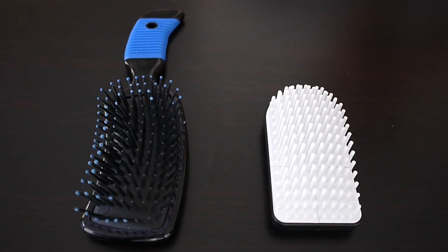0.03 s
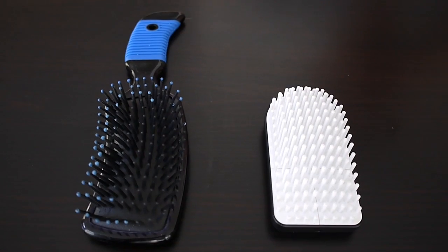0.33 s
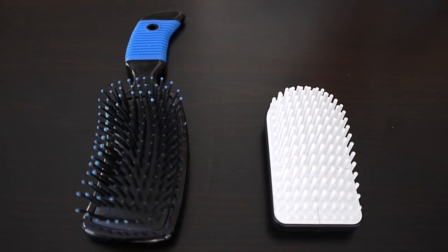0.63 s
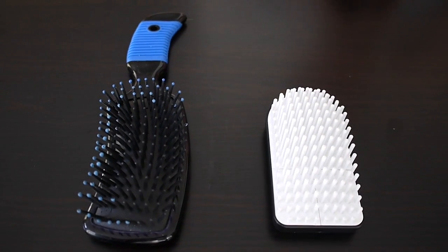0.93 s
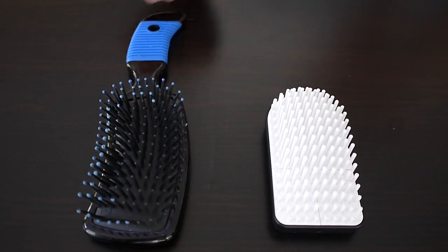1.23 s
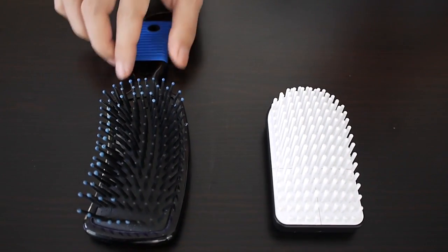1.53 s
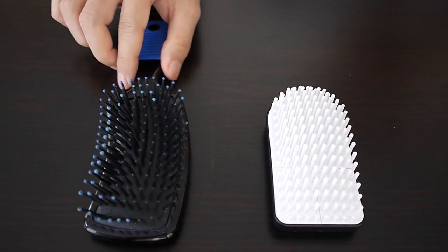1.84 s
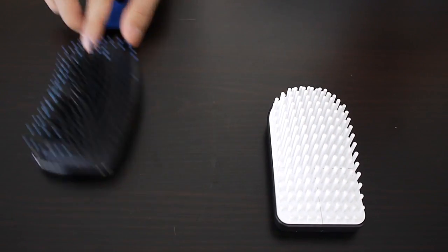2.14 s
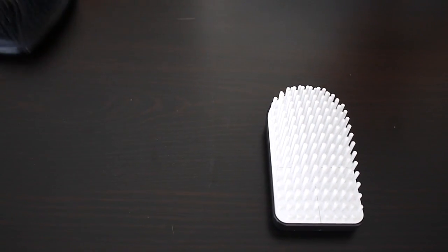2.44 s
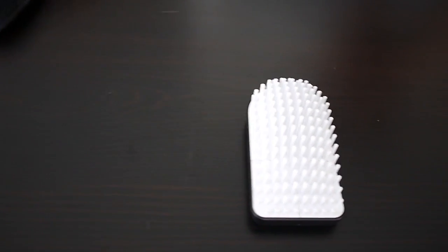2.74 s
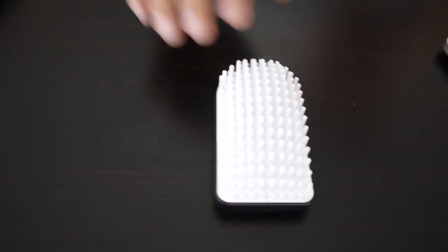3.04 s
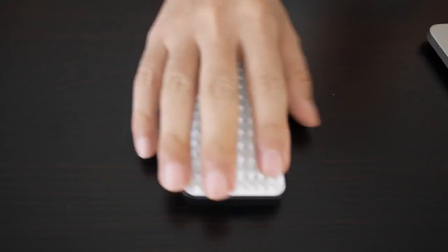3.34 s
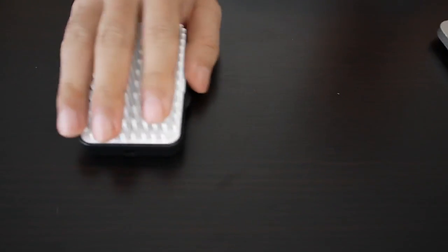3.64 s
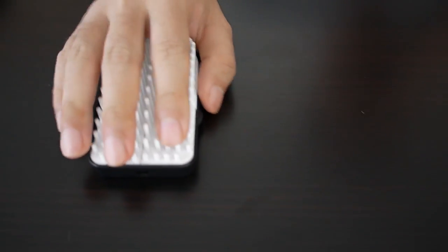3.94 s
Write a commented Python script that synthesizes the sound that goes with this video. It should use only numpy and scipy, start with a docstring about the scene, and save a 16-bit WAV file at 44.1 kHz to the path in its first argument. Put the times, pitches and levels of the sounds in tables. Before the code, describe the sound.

A plastic hairbrush scrapes across a wooden table after a few light taps, then rattles down. A second brush slides with a darker scrape and ends in a click, heard close up in a small, quiet room.

```python
"""In a small room with steady background noise, a sleeve rustles among light taps and faint soft blips.
From 1.9 s a plastic hairbrush is pulled across a wooden table; by 2.8 s it has knocked down at the edge.
At 3.4 s a hand lands on a flat-backed brush and slides it away, and it clicks down near 3.9 s.
Countless tiny contacts ring each plastic back, brighter as it moves faster,
and shake the table top, which booms at every knock."""
import sys
import numpy as np
from scipy import signal
from scipy.fft import rfft, irfft
from scipy.io import wavfile

SR = 44100
rng = np.random.default_rng(int(sys.argv[2]) if len(sys.argv) > 2 else 0)


def wrap_up_sound(samples):
    """Save the sound to the file named by the first command line argument, as 16-bit audio."""
    columns = np.atleast_2d(samples).T
    # keep every value between -1 and 1, then stretch to whole-number steps
    tamed = np.clip(columns, -1, 1)
    steps = np.round(tamed * 32767).astype(np.int16)
    wavfile.write(sys.argv[1], SR, steps)


N = 176400
T = np.arange(N) / SR
FREQS = np.arange(N // 2 + 1) * SR / N
TOP_HZ = 15400

# speed surges of the pull: top speed t/s, rise/s, fall/s, scrape/dB, treble/dB, rumble/dB
HAIRBRUSH_PULLS = [(1.93,0.057,0.12,-48,-57.5,-47),(2.03,0.068,0.34,-39.5,-49.5,-44.5),(2.212,0.17,0.035,-34.5,-29.5,-55),(2.255,0.071,0.071,-57,-29.5,-48),(2.344,0.053,0.045,-40,-29,-59),(2.405,0.082,0.15,-34.5,-28.5,-42),(2.513,0.027,0.044,-32,-56,-62)]
# scrape EQ: f/Hz, level/dB
HAIRBRUSH_EQ = [(200,-20),(450,-29),(750,-7),(1000,-0.5),(2200,-4),(7800,-10.5),(10500,-14.5),(15500,-27)]
# resonances of the plastic back: f/Hz, width/Hz, boost/dB
HAIRBRUSH_BODY = [(1412,68,7.5),(1910,120,3.5),(2680,410,4),(3480,160,4),(7700,120,4)]
def hairbrush_pull():
    """The hairbrush's back scrapes over the wood in bright surges."""
    return slide(HAIRBRUSH_PULLS, HAIRBRUSH_EQ, HAIRBRUSH_BODY, start_s=1.87, rumble_cut_hz=380)


# gliding rasp: t/s, f/Hz, level/dB
RASP = [(1.9,1051,-49),(2.12,1309,-40.5),(2.22,1411,-36.5),(2.29,1248,-59),(2.39,1055,-34),(2.52,1320,-54),(2.62,1050,-57)]
# hollow drone: t/s, f/Hz, level/dB
DRONE = [(1.92,321.7,-53.5),(2.04,327.3,-39),(2.12,369.6,-54),(2.255,368.7,-41),(2.295,278.6,-48),(2.495,286.5,-42),(2.56,290,-62)]
def hairbrush_notes():
    """Friction draws a rasp and a drone from the moving hairbrush."""
    return resonance(RASP, width_hz=350) + resonance(DRONE, width_hz=103)


# knocks and rattle: t/s, thud/dB, boom/dB, clack/dB, brightness/Hz, hollow ring/dB
HAIRBRUSH_KNOCKS = [(2.375,-21.5,-37.5,-26,1405,-44),(2.49,-36,-38.5,-45,2000,-56),
                    (2.7106,-25,-61,-20,5160,-28.5),(2.7468,-31.5,-44,-19,3600,-36.5),(2.755,-37,-40,-22.5,1600,-39),(2.792,-37,-44.5,-28,2090,-54)]
# modes of the plastic and of the hollow: f/Hz, level/dB, t60/s
HAIRBRUSH_RING = [(1320,-1,0.017),(2734,5,0.0054),(3750,5,0.0033)]
HOLLOW_RING = [(340,0,0.077)]
# crack EQ: f/Hz, level/dB
HAIRBRUSH_CRACK = [(600,-17),(1300,6),(4600,-3.5),(8500,-32)]
def hairbrush_knocks():
    """The hairbrush rattles down, ringing the hollow under its bristle cushion."""
    hits = knocks(HAIRBRUSH_KNOCKS, HAIRBRUSH_RING, HAIRBRUSH_CRACK, crack_db=-7)
    hollow = convolve(blows(HAIRBRUSH_KNOCKS, column=5), ring(HOLLOW_RING))
    return hits + in_room(hollow)


# speed surges of the push: top speed t/s, rise/s, fall/s, scrape/dB, treble/dB, rumble/dB
FLAT_PUSHES = [(3.50,0.083,0.051,-32.5,-42,-45),(3.60,0.12,0.094,-34,-40,-43.5),(3.68,0.02,0.057,-39.5,-55,-40),(3.80,0.16,0.37,-60.5,-61.5,-60)]
# scrape EQ: f/Hz, level/dB
FLAT_EQ = [(200,-18),(430,-1),(1100,-2),(1550,-5),(1950,-12),(2300,-5),(3500,-11.5),(4400,-17.5),(8500,-23),(15500,-37.5)]
# resonances of the flat back: f/Hz, width/Hz, boost/dB
FLAT_BODY = [(731,14,6),(1010,22,8.3),(2300,41,4.5)]
def flat_brush_push():
    """The flat brush slides away with a darker scrape."""
    return slide(FLAT_PUSHES, FLAT_EQ, FLAT_BODY, start_s=3.375, rumble_cut_hz=175)


# rubbing note: t/s, f/Hz, level/dB
RUB = [(3.45,900,-56),(3.6,700,-37.5),(3.69,520.2,-41),(3.78,488,-66)]
def flat_brush_rub():
    """The friction note sinks as the flat brush slows."""
    return resonance(RUB, width_hz=470)


# closing click: t/s, thud/dB, boom/dB, clack/dB, brightness/Hz
FLAT_KNOCKS = [(3.8802,-32.5,-55,-28.5,13960)]
# modes of the click: f/Hz, level/dB, t60/s
FLAT_RING = [(278,-3.5,0.066),(960,-2,0.02),(2300,5,.01)]
# crack EQ: f/Hz, level/dB
FLAT_CRACK = [(700,2),(9000,-9),(11600,8),(13500,-8)]
def flat_brush_click():
    """The flat brush clicks down on the wood."""
    return knocks(FLAT_KNOCKS, FLAT_RING, FLAT_CRACK, crack_db=-1)


# modes of the table top, deepest first: f/Hz, level/dB, t60/s
TABLE_MODES = [(119.6,-8.5,0.68),(180.3,-2,0.083),(221.7,-2.5,0.16),(278.3,-6,0.13),(324.3,-1,0.14),(411,-1,0.096),(538.4,-6,0.064),(615.5,-9,0.075)]
def knocks(hits, modes, crack_eq, crack_db):
    """Each knock thuds and booms through the table and rings the plastic with a short crack."""
    rise_s, crack_s = 0.00099, 0.0021
    attack = 1 - np.exp(-T / rise_s)
    thud = unit_peak(ring(TABLE_MODES[1:], polarity=0.99) * attack)
    boom = unit_peak(ring(TABLE_MODES[:1]) * attack)
    clack = unit_peak(ring(modes, polarity=0.55))
    crack = noise(crack_eq) * np.exp(-T / crack_s) * undb(crack_db)
    contacts = 0
    for hit in hits:
        softness = signal.butter(2, min(hit[4], TOP_HZ), fs=SR)  # softer contacts are duller
        contacts += signal.lfilter(*softness, blows([hit], column=3) + 1e-18)
    direct = convolve(blows(hits, column=1), thud) + convolve(contacts, clack + crack)
    low_cut = signal.butter(4, 95, "high", fs=SR, output="sos")
    return signal.sosfilt(low_cut, in_room(direct) + convolve(blows(hits, column=2), boom))


# pan of the slides: f/Hz, left minus right/dB
SLIDE_PAN = [(400,1.5),(2000,1),(4400,3),(8000,0.7)]
def slide(moves, colour, body, start_s, rumble_cut_hz):
    """Dense tiny contacts, with uneven grip, ring the plastic back and shake the table."""
    contacts_per_s, judder_db, judder_hz = 20000, 1.7, 130
    crossover_hz, grip_release_s, left_lead_s = 3600, 0.025, 14e-6
    contacts = spread(rng.standard_normal((2, N)) * (rng.random((2, N)) < contacts_per_s / SR))
    judder = unit_rms(filtered(rng.standard_normal(N), lowpass(judder_hz)))
    contacts *= undb(judder_db * judder)
    body_db = sum(db / (1 + (2 * (FREQS - hz) / width) ** 2) for hz, width, db in body)
    back = eq(colour) * undb(body_db) * (1 - lowpass(150))
    lows = lowpass(crossover_hz, order=4)
    scrape = unit_rms(filtered(contacts, back * lows)) * surges(moves, column=3)
    treble = unit_rms(filtered(contacts, back * (1 - lows))) * surges(moves, column=4, speed_power=1.72)
    table = convolve(contacts, ring(TABLE_MODES))
    rumble = unit_rms(filtered(table, 1 - lowpass(rumble_cut_hz))) * surges(moves, column=5)
    moving = np.clip((T - start_s) / grip_release_s, 0, 1)
    sides = np.array([[.5], [-.5]])
    pan = eq(SLIDE_PAN) ** sides * np.exp(2j * np.pi * FREQS * left_lead_s * sides)
    return in_room(filtered((scrape + treble + rumble) * moving, pan))


def surges(moves, column, speed_power=1):
    """The speed swells and dies in each surge, and the level follows a power of it."""
    roundness = 1.98  # 1 is a pointed surge, 2 a round one
    energy = 0
    for move in moves:
        peak_s, rise_s, fall_s = move[:3]
        away = np.abs(T - peak_s) / np.where(T < peak_s, rise_s, fall_s)
        speed = np.exp(-away ** roundness)
        energy += (undb(move[column]) * speed ** speed_power) ** 2
    return np.sqrt(energy)


def resonance(glide, width_hz):
    """Friction drives one noisy resonance whose pitch moves with the brush."""
    times, hz, _ = np.array(glide, float).T
    a, b = filtered(rng.standard_normal((2, N)), lowpass(width_hz / 2, order=4))
    phase = 2 * np.pi * np.cumsum(np.interp(T, times, hz)) / SR
    band = unit_rms(a * np.cos(phase) + b * np.sin(phase))
    return in_room(band * fader(glide, column=2))


# handling bumps: t/s, thud/dB, boom/dB, clack/dB, brightness/Hz
TAPS = [(0.149,-40.5,-55.5,-44,2000),(0.6344,-34,-51,-31.5,10000),(0.645,-31,-53,-32.5,1800),(0.68,-35,-57,-50,900),(.7345,-40.5,-51,-37.5,7000),(1.645,-32,-39.5,-34.5,6000)]
# modes of a tap: f/Hz, level/dB, t60/s
TAP_RING = [(394,-4,0.045),(786,-1.5,.016),(1455,4.5,0.0079)]
# crack EQ: f/Hz, level/dB
TAP_CRACK = [(1900,4.5),(2700,-22),(5300,-0.5),(15000,-16)]
def taps():
    """Light handling bumps the table before the pull."""
    return knocks(TAPS, TAP_RING, TAP_CRACK, crack_db=-0.5)


def palm():
    """The hand lands on the flat brush with a soft, low bump."""
    at_s, width_s, level_db = 3.435, .024, -36.5
    bump = noise([(30, -28), (65, 13), (120, 16), (240, 20.5), (450, -22)])
    return bump * bell(at_s, width_s) * undb(level_db)


# background blips: t/s, level/dB
BLIPS = [(.337,-45),(.402,-47),(0.682,-38.5),(.87,-45.5),(2.875,-39),(3.083,-48),(3.21,-49.5),(3.269,-45.5)]
def blips(hz=485, width_s=0.0027):
    """Faint, short tones on one pitch."""
    return in_room(sum(undb(db) * bell(t, width_s) * np.sin(2 * np.pi * hz * (T - t)) for t, db in BLIPS))


# rustle fader: t/s, level/dB
SLEEVE_FADER = [(.08,-58.5),(.48,-60.5),(.55,-53),(.72,-50),(.79,-59.5),(.86,-55),(1.3,-87)]
# cloth EQ: f/Hz, level/dB
SLEEVE_EQ = [(800,3.5),(2800,-5.5),(5000,-2.5),(9000,-3),(15000,-10)]
def sleeve():
    """A sleeve rustles in soft swells of noise."""
    return noise(SLEEVE_EQ) * fader(SLEEVE_FADER)


# EQ of the steady air and of the low swell: f/Hz, level/dB
AIR_EQ = [(25,-46),(104,-9.5),(280,-9.5),(631,-17),(7700,-24.5),(15500,-34.5)]
SWELL_EQ = [(60,-22.5),(150,0),(380,-1),(700,-7.5),(3000,-31)]
# swell fader: t/s, level/dB
SWELL_FADER = [(.08,-54),(.5,-59.5),(.85,-58),(1.2,-61.5),(2.6,-53.5),(3.35,-60.5),(4.0,-68)]
def room_tone():
    """A steady bed of noise under a slow, low swell."""
    return noise(AIR_EQ) * undb(-60) + noise(SWELL_EQ) * fader(SWELL_FADER)


def in_room(direct):
    """The sound plus the diffuse echoes of a small room; the treble dies first."""
    low_t60_s, treble_t60_s, predelay_s, wet_db = 0.61, 0.24, 0.0026, -8.5
    echoes = spread(rng.standard_normal((2, N)))
    lows = filtered(echoes, lowpass(2500))
    tail = (lows * decay(low_t60_s) + (echoes - lows) * decay(treble_t60_s)) * (T > predelay_s)
    return direct + convolve(direct, tail / np.sqrt(np.sum(tail ** 2) / 2)) * undb(wet_db)


# stereo width: f/Hz, side minus mid/dB
WIDTH = [(150,-18),(400,-14),(1300,-10),(4400,-8),(8000,-7),(15000,-2)]
def spread(pair):
    """Two unrelated signals as mid and side: narrow in the bass, wide in the treble."""
    side = filtered(pair[1], eq(WIDTH))
    return np.array([pair[0] + side, pair[0] - side])


def ring(modes, polarity=-1):
    """Modes struck once; each is weighted by a further factor of polarity (-1 alternates the signs)."""
    return sum(polarity ** k * undb(db) * decay(t60) * np.sin(2 * np.pi * hz * T)
               for k, (hz, db, t60) in enumerate(modes))


def blows(hits, column):
    """One impulse for each knock, as strong as the chosen column."""
    out = np.zeros(N)
    for hit in hits:
        out[int(hit[0] * SR)] += undb(hit[column])
    return out


def noise(colour):
    return unit_rms(filtered(spread(rng.standard_normal((2, N))), eq(colour)))


def eq(points):
    """Gain at every frequency from f/Hz, level/dB points."""
    hz, db = np.array(points, float).T
    return undb(np.interp(np.log(FREQS + 1), np.log(hz), db))


def fader(rows, column=1):
    """Gain over time from a dB column, silent outside it."""
    rows = np.array(rows, float)
    return undb(np.interp(T, rows[:, 0], rows[:, column], left=-120, right=-120))


def lowpass(hz, order=2):
    return 1 / (1 + (FREQS / hz) ** order)


def filtered(x, gain):
    return irfft(rfft(x) * gain, N)


def convolve(x, response):
    return signal.fftconvolve(np.atleast_2d(x), np.atleast_2d(response), axes=1)[:, :N]


def decay(t60):
    return np.exp(-np.log(1000) * T / t60)


def bell(at_s, width_s):
    return np.exp(-.5 * ((T - at_s) / width_s) ** 2)


def undb(db):
    return 10 ** (np.asarray(db) / 20)


def unit_rms(x):
    return x / np.sqrt(np.mean(x ** 2))


def unit_peak(x):
    return x / np.abs(x).max()


def scene():
    """Both slides, with their notes, the knocks and the background set slightly left."""
    slides = hairbrush_pull() + flat_brush_push()
    notes = hairbrush_notes() + flat_brush_rub()
    hits = taps() + flat_brush_click() + hairbrush_knocks() + palm()
    background = blips() + room_tone() + sleeve()
    lean_left = undb([[.4], [-.4]])
    return slides + (notes + hits + background) * lean_left


def record(dry):
    """The sound fades in quickly and the top is cut."""
    start_s, fade_s = 0.08, 0.029
    fade_in = np.clip((T - start_s) / fade_s, 0, 1)
    return signal.sosfilt(signal.ellip(10, .2, 80, TOP_HZ, fs=SR, output="sos"), dry * fade_in)


dry = scene()
out = record(dry)
wrap_up_sound(out)
```